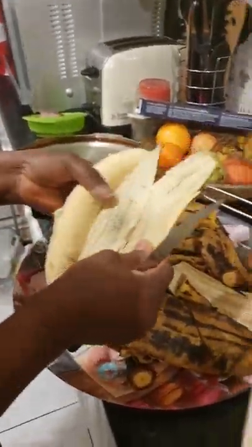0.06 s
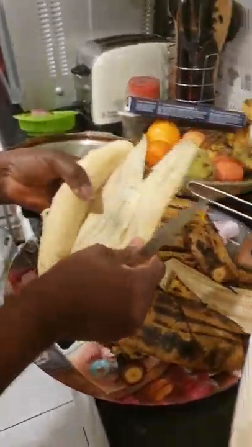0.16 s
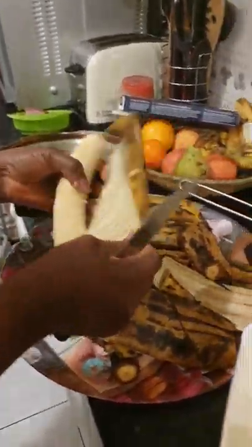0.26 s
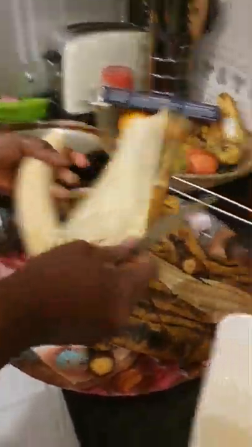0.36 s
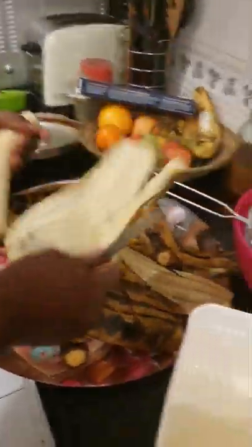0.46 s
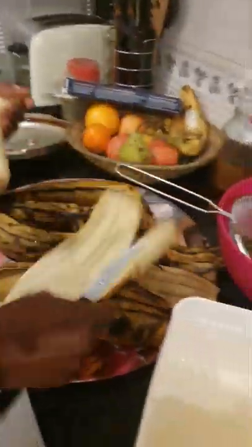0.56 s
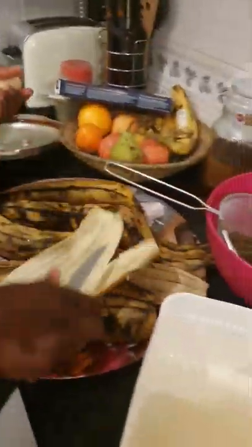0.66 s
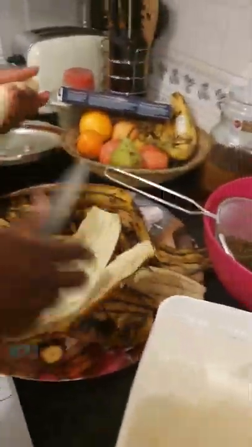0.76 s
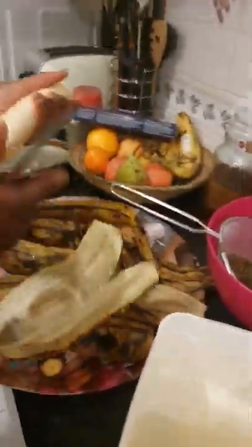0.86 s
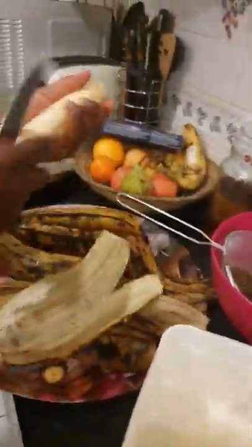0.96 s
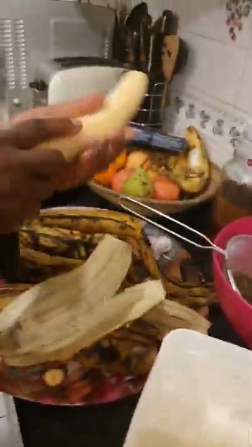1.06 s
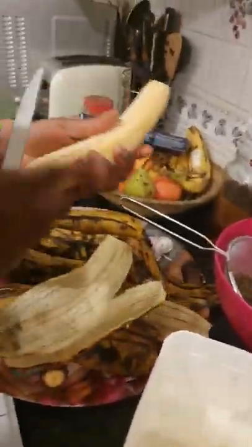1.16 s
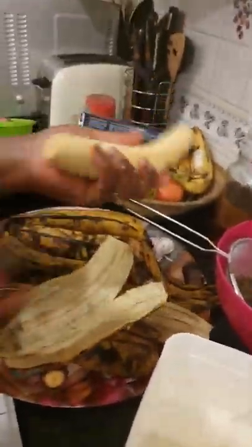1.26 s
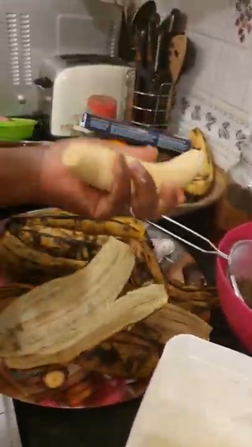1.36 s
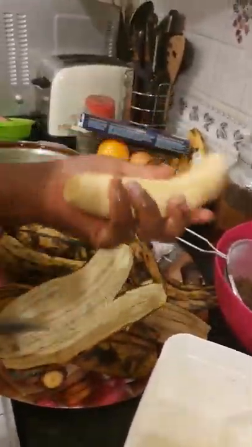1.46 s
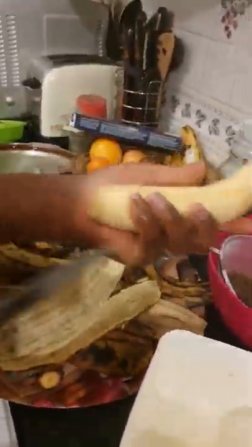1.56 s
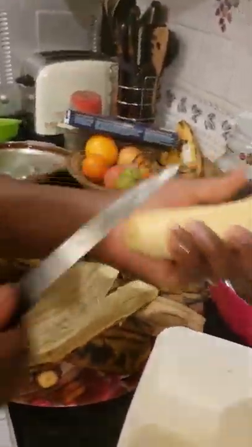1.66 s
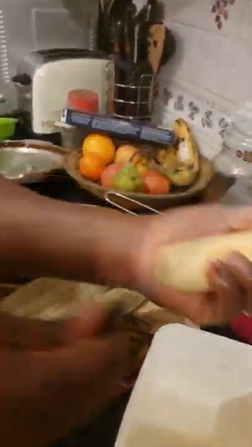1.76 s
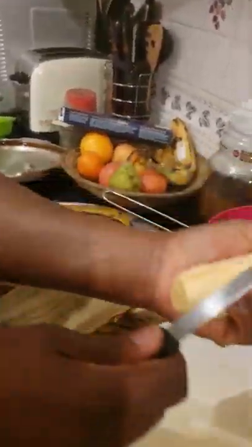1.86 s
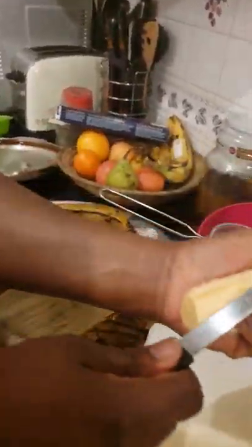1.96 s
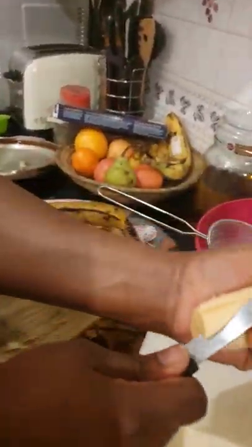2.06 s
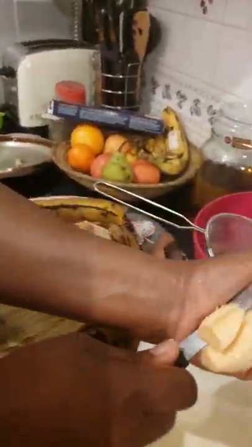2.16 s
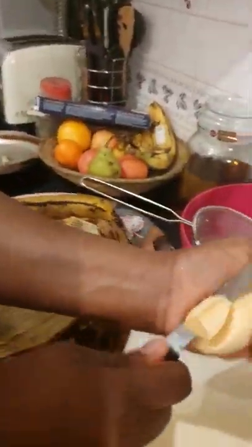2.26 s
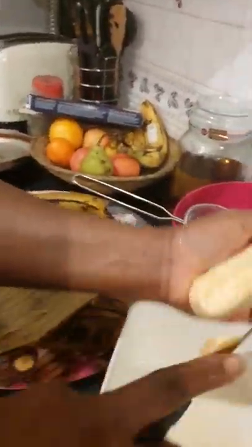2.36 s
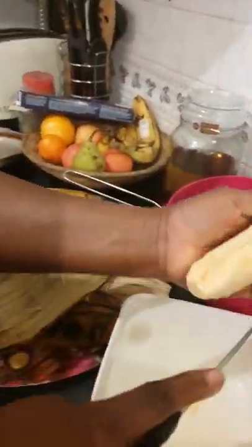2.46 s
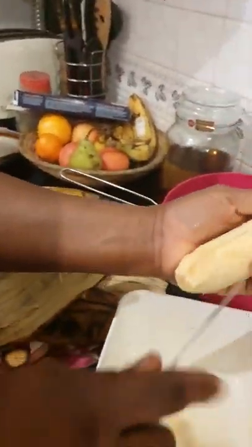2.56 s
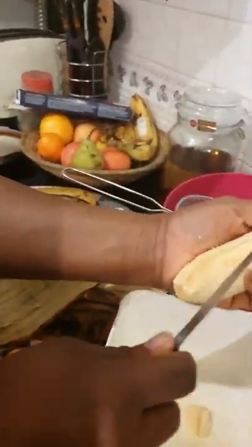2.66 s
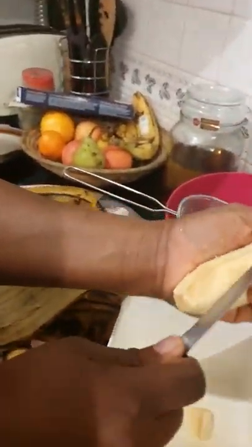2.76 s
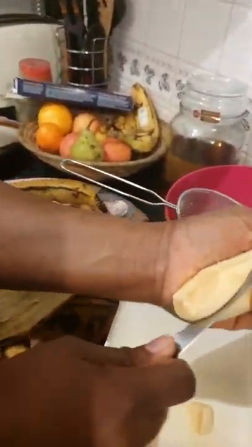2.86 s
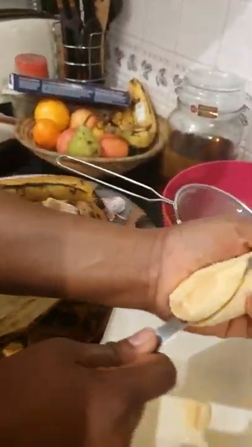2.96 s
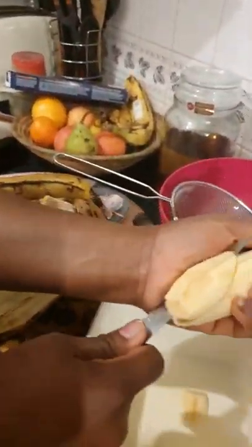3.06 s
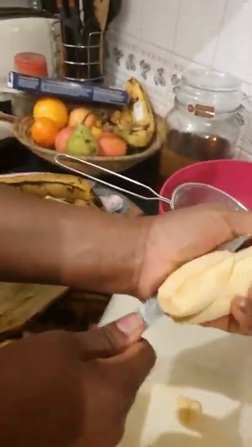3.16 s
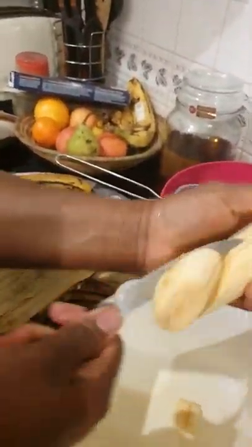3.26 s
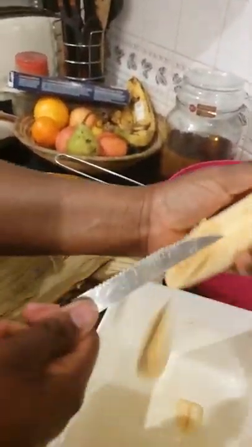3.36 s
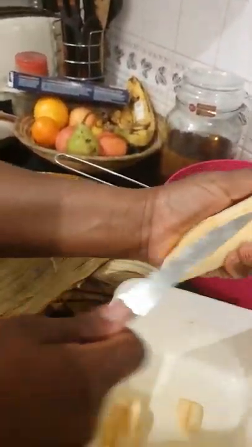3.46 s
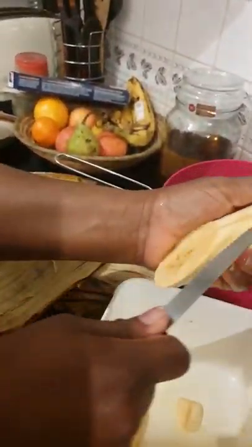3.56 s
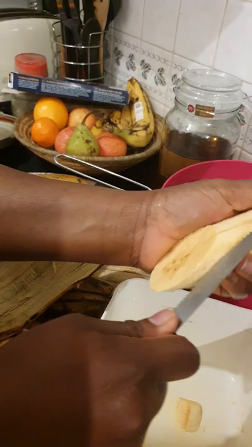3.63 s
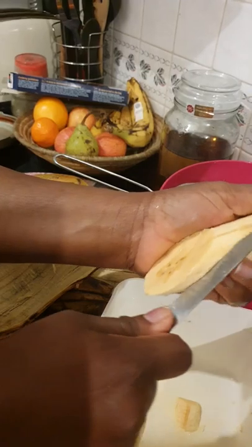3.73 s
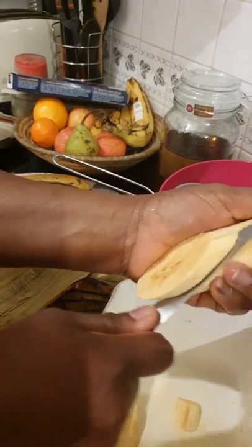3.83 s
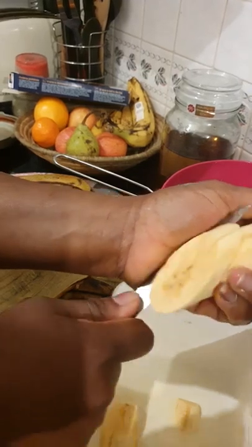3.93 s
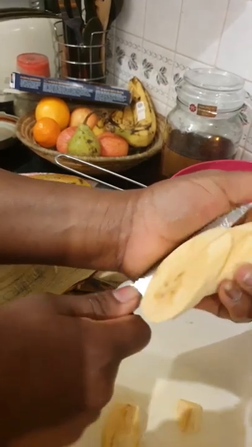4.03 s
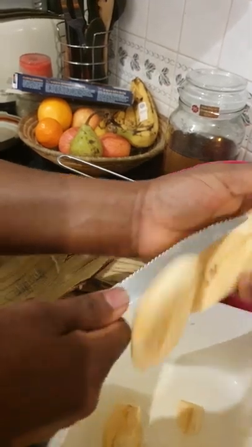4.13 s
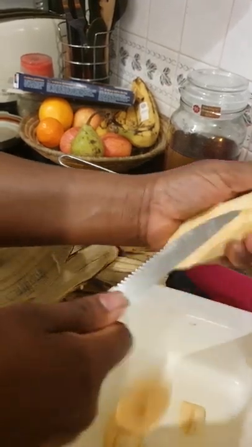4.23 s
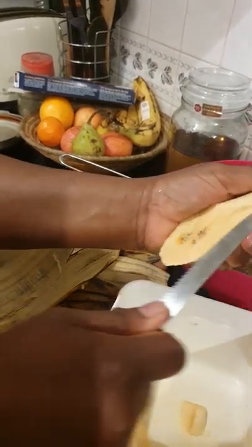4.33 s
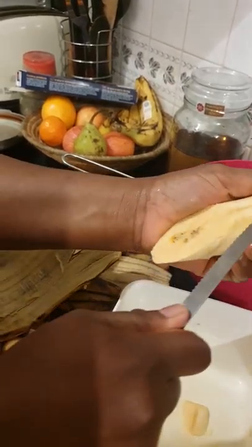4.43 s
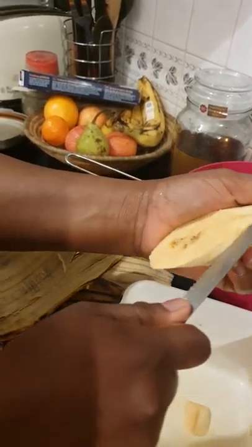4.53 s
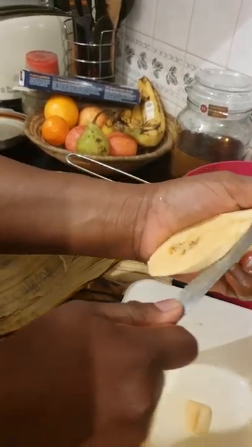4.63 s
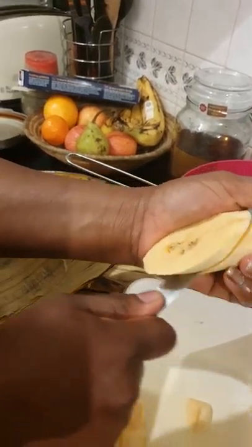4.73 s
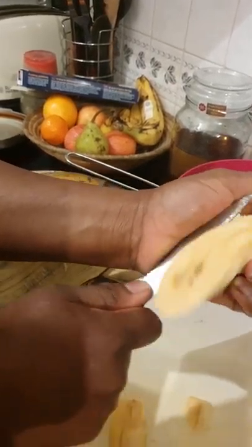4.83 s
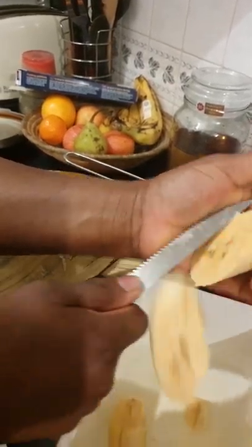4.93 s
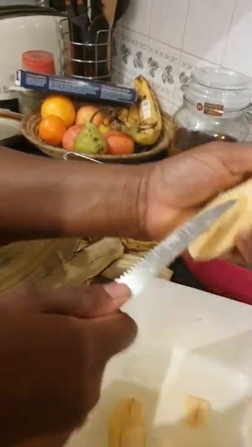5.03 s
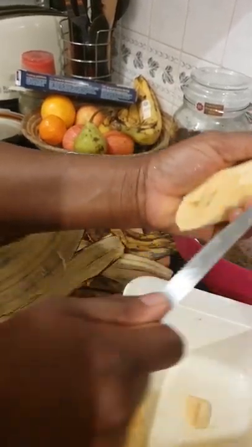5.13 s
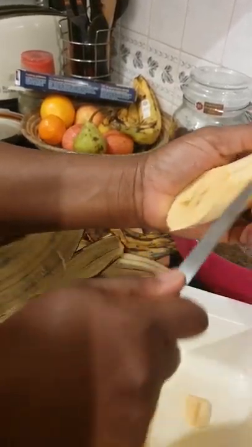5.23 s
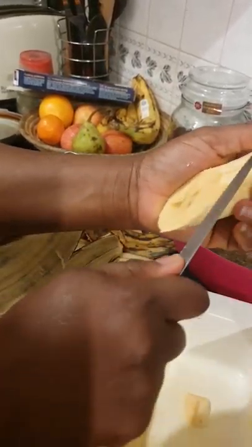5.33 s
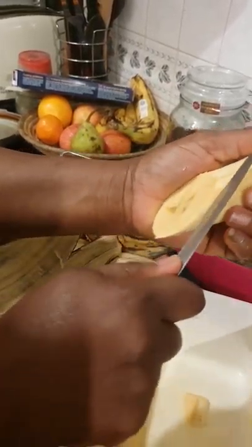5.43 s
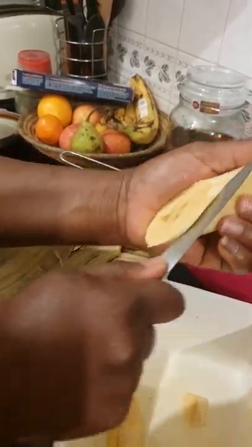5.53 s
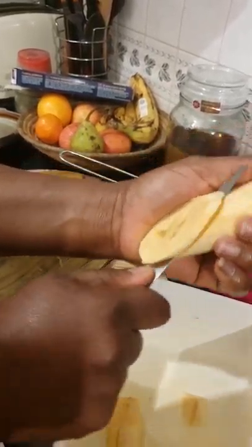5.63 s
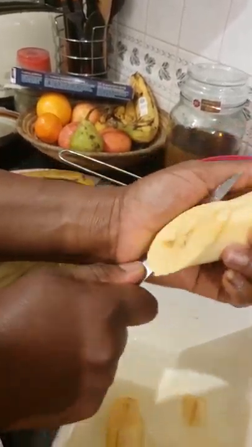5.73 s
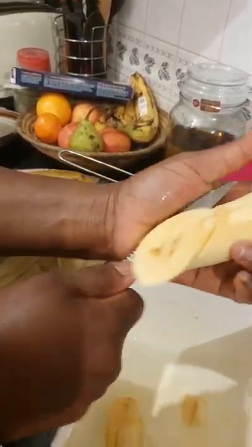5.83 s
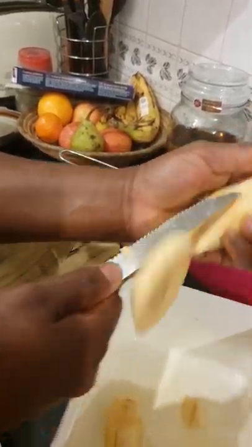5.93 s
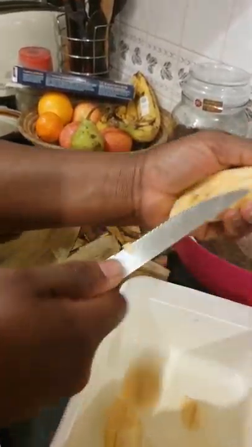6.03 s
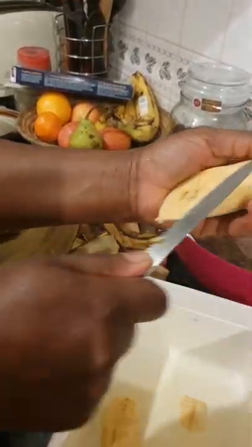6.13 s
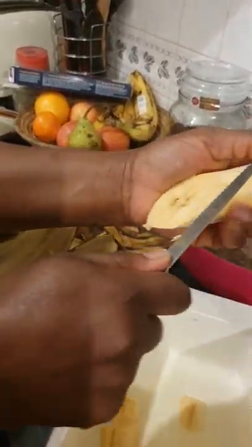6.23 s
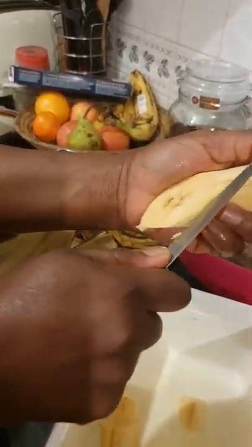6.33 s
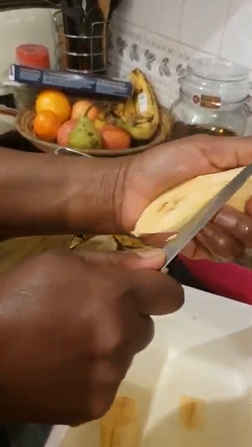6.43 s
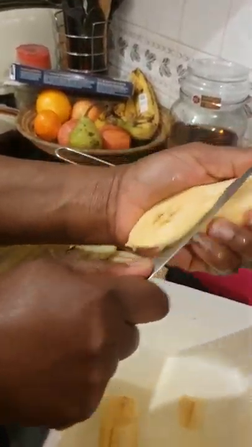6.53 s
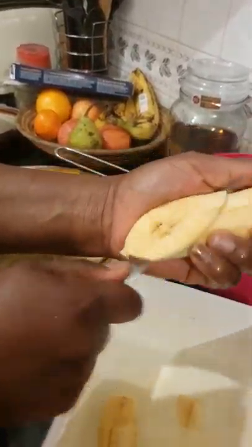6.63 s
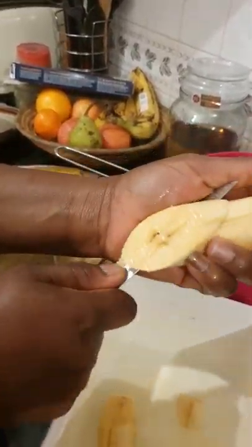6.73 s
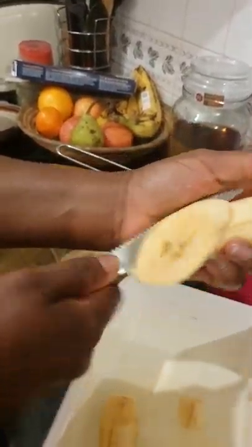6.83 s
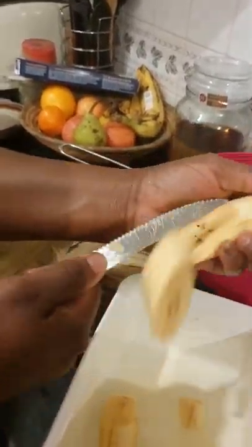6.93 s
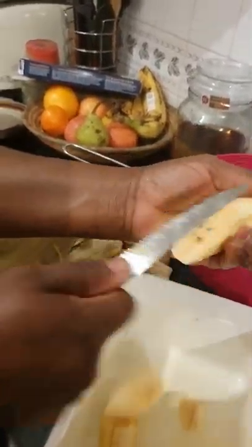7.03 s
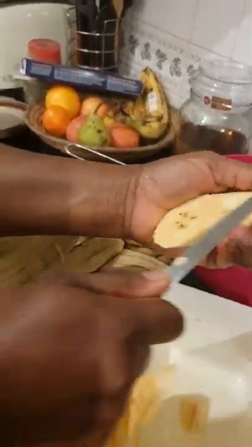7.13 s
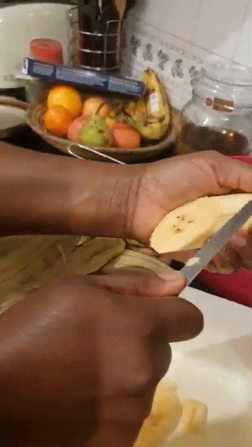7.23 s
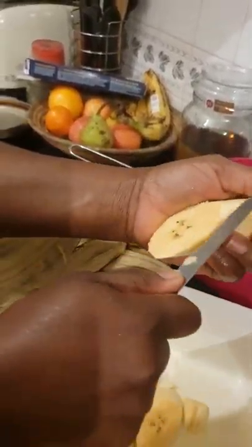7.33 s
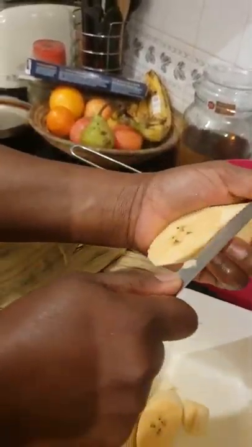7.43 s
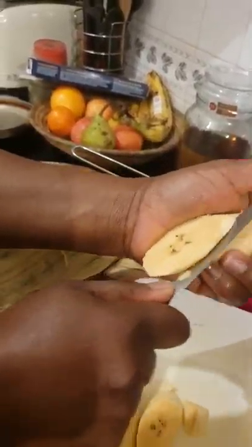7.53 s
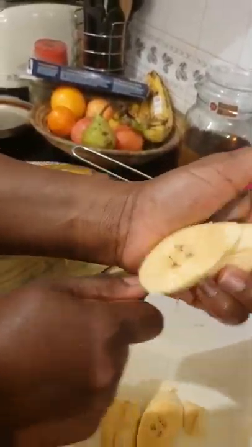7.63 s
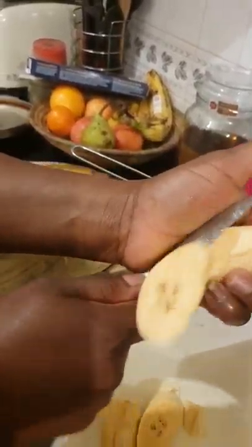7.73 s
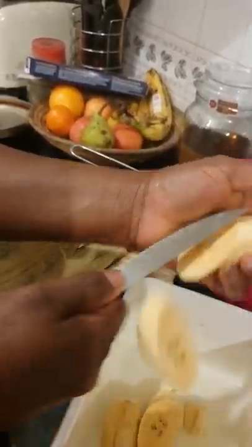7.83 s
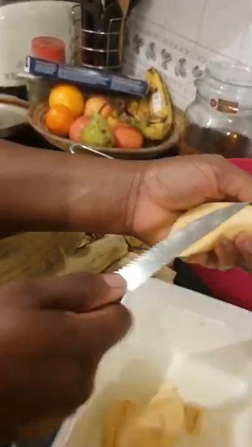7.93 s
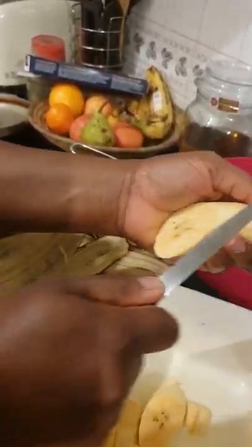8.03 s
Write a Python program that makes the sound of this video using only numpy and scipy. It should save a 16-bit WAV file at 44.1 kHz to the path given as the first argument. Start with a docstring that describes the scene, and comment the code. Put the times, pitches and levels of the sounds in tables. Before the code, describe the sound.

A close stereo kitchen scene with steady low air noise, thin hiss and very faint hum. From 0 to 0.5 seconds, peel tears in soft fibrous crackles, then lands with a small dull bump. Bare fruit rubs quietly in the palm until 1.6, with a sticky tick near 1.5. The first wet cut breaks at 2.1; slices slap the plastic tray around 2.6. More juicy, serrated strokes swell and release near 3.05, 3.9, 4.8, 5.7, 6.7 and 7.6, the later ones with clear snaps. Wet slaps with a deep, short boom and hollow plastic rattle follow around 3.2, a sharp one at 3.5, then 4.3, 5.1, 6.1, a strong one at 7.1, and 7.95. Lighter flops trail some landings. Tiny slippery squeaks precede several cuts, and tiled walls add a brief tail.

```python
"""Peel tears away and bare fruit slides in the palm, then a plantain is sliced in the hand over a plastic tray.
Each knife stroke hisses wetly, as crackling noise that swells to the break, and most end in a clear snap.
Slices slap into the tray as a noisy resonance; damped modes make its floor boom and its walls ring briefly,
and some slices flop over. A small tiled kitchen adds a short tail over steady air noise, hiss and faint hum."""
import sys
import numpy as np
from scipy import signal
from scipy.fft import rfft, irfft
from scipy.io import wavfile

SR = 44100
rng = np.random.default_rng(int(sys.argv[2]) if len(sys.argv) > 2 else 0)


def dump(signal):
    """Clip the signal to [-1, 1] and save it as 16-bit WAV at the path in sys.argv[1]."""
    limited = np.clip(np.atleast_2d(signal).T, -1, 1)
    pcm = np.round(limited * 32767).astype(np.int16)
    wavfile.write(sys.argv[1], SR, pcm)


N = 356769
TIME = np.arange(N) / SR
AGE = TIME[:SR // 2]  # half a second, the time since a single blow

# knife strokes, each building up until the blade breaks free:
# break_s, swell_s (time constant), drag_db, juice_fizz_db, snap_db
CUTS = [(2.135, 0.032, -42.5, -42.5, -54), (3.051, 0.033, -59, -48, -59), (3.934, 0.026, -48, -39.5, -32),
        (4.8012, 0.017, -42.5, -38, -24), (5.7245, 0.049, -60, -44.5, -29), (6.675, 0.034, -42, -40, -33),
        (7.637, 0.025, -40.5, -39.5, -29)]
# bright colour of bursting juice and tearing fibres: pitch_hz, density_db (per Hz)
FIZZ = [(1500, 4), (4000, 11.5), (6000, 7.5), (9000, 2.5), (12000, -2), (15500, -5)]


def undb(db):
    """Decibels to gain."""
    return 10 ** (np.asarray(db) / 20)


def unit(x):
    """Scale to rms 1."""
    return x / np.sqrt(np.mean(x ** 2))


def burst(x, span_s):
    """Scale a blow so that its energy equals that of rms 1 held for span_s."""
    energy = np.sum(x ** 2, axis=-1, keepdims=True)
    return x / np.sqrt(energy / (span_s * SR))


def on_bins(points, size):
    """Join (Hz, value) points on a log-frequency axis, one value per FFT bin."""
    hz, value = np.transpose(points)
    bin_hz = np.fft.rfftfreq(size, 1 / SR)
    return np.interp(np.log(bin_hz + 1), np.log(hz), value)


def colour(x, points, size=2048):
    """Causal minimum-phase filter with the given (Hz, dB) outline, by folding the cepstrum."""
    cepstrum = irfft(np.log(undb(on_bins(points, size))))
    cepstrum[1:size // 2] *= 2
    cepstrum[size // 2 + 1:] = 0
    response = irfft(np.exp(rfft(cepstrum)))
    return signal.fftconvolve(np.atleast_2d(x), response[None], axes=-1)[:, :x.shape[-1]]


def band(x, hz, kind, order=2):
    """Butterworth filter."""
    return signal.sosfilt(signal.butter(order, hz, kind, fs=SR, output="sos"), x)


def add(out, start_s, x):
    """Mix a sound in at start_s."""
    i = int(start_s * SR)
    out[:, i:i + x.shape[-1]] += x[..., :N - i]


def diffuse(size):
    """Noise from all around: alike at both microphones in the bass, unrelated in the treble."""
    # likeness of the two channels: pitch_hz, correlation (no unit)
    likeness_points = [(100, 0.89), (300, 0.93), (700, 0.72), (1500, 0), (10000, 0)]
    likeness = np.clip(on_bins(likeness_points, size), -1, 1)
    mid, side = rfft(rng.standard_normal((2, size)))
    mid = mid * np.sqrt(1 + likeness)
    side = side * np.sqrt(1 - likeness)
    return unit(irfft([mid + side, mid - side], size))


def tray():
    """A soft slice pushes the tray's floor, rings its walls and slaps on its wet face."""
    # slices landing and flopping over:
    # start_s, boom_db (floor), wall_db, wall_hz (pitch the blow favours), slap_db, slap_hz
    drops = [(2.5547, -46, -26.5, 585, -26.5, 2410), (2.5667, -44, -35.5, 570, -17, 2470),
             (2.6821, -57, -34.5, 520, -34.5, 1420), (3.129, -39, -40.5, 330, -37.5, 3080),
             (3.1787, -26.5, -22, 490, -19.5, 3120), (3.213, -41, -31.5, 440, -38, 2700),
             (3.4737, -31, -20.5, 680, -12, 2550), (3.4920, -41, -22, 660, -13.5, 3230),
             (4.2757, -37.5, -32, 354, -22.5, 3020), (4.2795, -58, -45, 1200, -26.5, 1640),
             (4.301, -34.5, -36.5, 334, -54, 2900), (4.465, -37.5, -31.5, 475, -29.5, 2800),
             (5.0683, -29, -35, 354, -33, 2760), (5.0925, -29.5, -28, 350, -25.5, 3100),
             (6.0893, -32, -37, 367, -23.5, 2900), (6.224, -39, -43.5, 395, -36.5, 3160),
             (7.066, -25, -28, 383, -15, 2850), (7.2408, -43, -36, 344, -38, 3000),
             (7.3156, -45, -40.5, 1170, -30.5, 2670), (7.948, -30.5, -28, 378, -24, 3200),
             (7.9545, -46, -38, 590, -28, 3270)]
    # lowest floor modes: pitch_hz, level_db, t60_s
    boom_modes = [(65.8, 1, 0.4), (71.9, 23.5, 0.2), (82.1, -0.5, 0.6), (107, -1.5, 0.53)]
    # next floor modes up: pitch_hz, level_db, t60_s
    thud_modes = [(142.5, -14, 0.17), (163, -5, 0.13), (220.1, -9, 0.17)]
    # wall modes: pitch_hz, level_db, t60_s
    wall_modes = [(304, -10, 0.096), (330, 3, 0.078), (362, 0.5, 0.15), (454, -26, 0.41), (506, -12, 0.14),
                  (565.6, -8, 0.4), (634, 6.5, 0.17), (672, 5.5, 0.2), (726, -1, 0.19), (839, 3, 0.17),
                  (1012, -4, 0.15), (1070, -5, 0.12), (1183, -11, 0.34), (1344, -27, 0.043),
                  (1524, 13.5, 0.035)]
    # stiff modes that only a sharp slap reaches: pitch_hz, level_db, t60_s
    stiff_modes = [(1402, 1.5, 0.12), (1720, -6, 0.055), (1960, -1, 0.11), (2297, 9, 0.049),
                   (2425, 7.5, 0.027), (2720, 6, 0.025), (2810, -29, 0.044), (2860, 5.5, 0.11),
                   (3360, 15.5, 0.035)]
    # colour of the wet slap: pitch_hz, density_db (per Hz)
    slap_colour = [(200, -30), (600, -14), (1100, 15), (1700, 3.5), (2400, 4), (3300, 7.5), (4200, 10),
                   (5000, -9.5), (8000, -17), (15000, -36)]
    boom_rise_s = 0.022
    out = np.zeros((2, N))
    lean = undb(np.array([[-1.3], [1.3]]))  # the tray stands a little to the right
    for start_s, boom_db, wall_db, wall_hz, slap_db, slap_hz in drops:
        thud_db = (boom_db + wall_db) / 2 - 5
        # higher slaps are wetter: 32 dB more spray per octave
        spray_db = slap_db - 11.5 + 32 * np.log2(slap_hz / 2990)

        boom = ring(boom_modes, scatter_db=-1.0, spread_hz=740)
        boom = burst(boom * (1 - np.exp(-AGE / boom_rise_s)), 0.047)
        thud = burst(ring(thud_modes, scatter_db=4, spread_hz=3600), 0.016)

        # the flesh squashes against the plastic and blurs the ring
        squash = band(diffuse(len(AGE)) * np.exp(-AGE / 0.016), [200, 2000], "band")
        walls = burst(ring(wall_modes, scatter_db=2.8, spread_hz=930), 0.0058)
        walls = walls + undb(-9.5) * burst(squash, 0.084)
        # a flatter landing pushes longer and leaves the higher modes still
        walls = band(favour(walls, wall_hz, 0.9), 1.27 * wall_hz, "low")
        walls = burst(walls, 0.012)

        stiff = ring(stiff_modes, scatter_db=-1.0, spread_hz=1100)
        stiff = burst(favour(stiff, slap_hz, 1.55), 0.0084)
        slap = smack(slap_hz, decay_s=0.0016, width_hz=850, grit=0.6, broad=0.3, outline=slap_colour)
        wet_face = undb(slap_db) * (slap + undb(-12.5) * stiff)
        wet_face = wet_face + undb(spray_db) * spray(decay_s=0.0053)

        add(out, start_s, undb(wall_db) * walls - undb(boom_db) * boom + undb(thud_db) * thud)
        add(out, start_s, lean * wet_face)
    return out


def ring(modes, scatter_db, spread_hz):
    """Damped modes: strength varies with the spot struck, and higher modes reach the microphones out of step."""
    hz, db, t60_s = np.transpose(modes)[:, :, None]
    gain = undb(db + scatter_db * rng.standard_normal(hz.shape))
    skew = np.minimum(hz / spread_hz, 1) * rng.standard_normal(hz.shape)
    detune = 1 + 0.0065 * rng.standard_normal(hz.shape)  # pitch varies slightly at random from blow to blow
    onset = 1 - np.exp(-AGE / 0.00025)
    waves = gain * np.exp((2j * np.pi * hz * detune - np.log(1000) / t60_s) * AGE) * onset
    return np.array([np.sum(waves * np.exp(1j * side * skew), axis=0).imag for side in (1, -1)])


def favour(x, hz, sharpness):
    """The spot and length of a blow favour the modes around one pitch."""
    return signal.lfilter(*signal.iirpeak(hz, sharpness, fs=SR), x)


def smack(hz, decay_s, width_hz, grit, broad, outline):
    """Wet faces meet or part: a sharp click and a short spatter ring one broad resonance."""
    spatter = burst(rng.standard_normal((2, len(AGE))) * np.exp(-AGE / decay_s), 1 / SR)
    click = signal.unit_impulse(len(AGE), SR // 2000)  # half a millisecond in
    push = click + grit * spatter
    pocket = signal.lfilter(*signal.iirpeak(hz, hz / width_hz, fs=SR), push)
    return burst(colour(pocket + broad * push, outline), 0.002)


def spray(decay_s):
    """A bright spit of bursting juice films, as decaying noise."""
    spit = rng.standard_normal((2, len(AGE))) * np.exp(-AGE / decay_s)
    return burst(colour(spit, FIZZ), 0.0029)


def knife():
    """The blade draws in, then force builds and lets go; serrations drag in small slips and burst juicy cells."""
    # blade drawn through the flesh early in a cut: start_s, length_s, level_db
    draws = [(2.83, 0.28, -55.5), (3.8, 0.11, -56), (4.67, 0.068, -52), (4.755, 0.011, -47),
             (5.55, 0.055, -47), (6.515, 0.061, -50.5), (6.635, 0.024, -55), (7.53, 0.038, -50.5)]
    # colour of the dragging blade: pitch_hz, density_db (per Hz)
    drag_colour = [(150, -17.5), (400, -21.5), (900, -16.5), (1700, -14), (2200, -7.5), (2600, -12),
                   (3100, -5.5), (3900, -5), (4800, -16.5), (7000, -31), (15000, -33)]
    release_s = 0.0082
    drag_gain = rubbing(draws)
    fizz_gain = undb(-4.5) * drag_gain
    for break_s, swell_s, drag_db, fizz_db, _ in CUTS:
        # exponential rise to the break, then a quicker fall
        force = np.exp(-np.maximum((break_s - TIME) / swell_s, (TIME - break_s) / release_s))
        drag_gain = drag_gain + undb(drag_db) * force
        fizz_gain = fizz_gain + undb(fizz_db) * force
    slips = undb(2.55 * unit(band(rng.standard_normal(N), 49, "low")))  # level wobble, 2.55 dB rms
    drag = unit(colour(crackle(rate_hz=1500, spread_db=2, hiss=0.5), drag_colour))
    fizz = unit(colour(crackle(rate_hz=5500, spread_db=0, hiss=1.8), FIZZ))
    return slips * (drag_gain * drag + fizz_gain * fizz)


def rubbing(rows):
    """Gain over time of sliding contacts: each takes hold, sags as it goes on and dies away."""
    attack_s, release_s, sag_db_per_s = 0.0073, 0.024, -12
    gain = np.zeros(N)
    for start_s, length_s, level_db in rows:
        age = np.maximum(TIME - start_s, 0)
        hold = undb(level_db + sag_db_per_s * (np.minimum(age, length_s) - length_s / 2))
        fade = np.exp(-np.maximum(age - length_s, 0) / release_s)
        gain += np.minimum(age / attack_s, 1) * hold * fade
    return gain


def crackle(rate_hz, spread_db, hiss):
    """Many tiny ruptures of uneven size over a smooth hiss."""
    ruptures = rng.random(N) < rate_hz / SR
    sizes = undb(spread_db * np.minimum(rng.exponential(size=N), 4))
    grains = ruptures * rng.standard_normal(N) * sizes
    return unit(unit(grains) + hiss * rng.standard_normal((2, N)))


def snaps():
    """The last fibres of each cut give way, and sticky faces part: short resonant smacks and spits."""
    # sticky ticks of fingers and blade: start_s, level_db, pitch_hz
    ticks = [(0.6098, -41.5, 1420), (1.5195, -28.5, 1900), (1.920, -39.5, 4400), (3.29, -50, 3450),
             (4.683, -45, 3200), (6.578, -45, 3000), (6.614, -39, 3400)]
    # a wet slice peels off the tray's floor with a thin spit: start_s, level_db
    spits = [(3.291, -50), (6.167, -43.5)]
    # colour of a wet snap: pitch_hz, density_db (per Hz)
    snap_colour = [(300, -47), (1200, 3), (2400, -2), (3100, 10), (4200, 4), (5500, -20), (8000, -24),
                   (15000, -18)]
    break_hz, break_decay_s = 3650, 0.002
    out = np.zeros((2, N))
    for break_s, _, _, _, snap_db in CUTS:
        snap = smack(break_hz, break_decay_s, width_hz=760, grit=7.5, broad=0.023, outline=snap_colour)
        add(out, break_s, undb(snap_db) * (snap + undb(-4) * spray(break_decay_s)))
    for start_s, level_db, pitch_hz in ticks:
        tick = smack(pitch_hz, 0.0028, width_hz=1000, grit=6.7, broad=0.034, outline=snap_colour)
        add(out, start_s, undb(level_db) * tick)
    for start_s, level_db in spits:
        add(out, start_s, undb(level_db) * spray(decay_s=0.0038))
    return out


def squeaks():
    """Wet skin and steel slip irregularly on the fruit and ring a narrow resonance that glides in pitch."""
    # start_s, length_s, level_db, start_hz, end_hz
    glides = [(0.787, 0.28, -54.5, 2727, 2864), (3.811, 0.11, -54, 3350, 3900),
              (4.575, .09, -52.5, 1600, 2090), (4.75, 0.05, -52, 2230, 2580),
              (5.324, 0.0436, -57, 5500, 5960), (6.515, 0.057, -46.5, 3440, 3730),
              (6.607, 0.055, -43, 3320, 3270)]
    out = np.zeros((2, N))
    for start_s, length_s, level_db, start_hz, end_hz in glides:
        progress = np.clip(AGE / length_s, 0, 1)
        phase = 2 * np.pi * np.cumsum(start_hz + (end_hz - start_hz) * progress) / SR
        # slow noise on both quadratures makes a narrow band around the glide
        jitter = band(rng.standard_normal((2, len(AGE))), 210, "low")
        tone = unit(jitter[0] * np.sin(phase) + jitter[1] * np.cos(phase))
        add(out, start_s, undb(level_db) * np.sin(np.pi * progress) * tone)
    return out


def hands():
    """Peel tears off and falls on the heap; the bare fruit slides round in the palm."""
    # pulls that tear the peel away: start_s, length_s, level_db
    pulls = [(0, 0.13, -55), (.15, 0.24, -58.5), (.228, 0.05, -49.5), (.46, 0.04, -56)]
    # fruit and peel sliding in the palm: start_s, length_s, level_db
    slides = [(.6, 0.2, -56.5), (.83, 0.26, -56.5), (1.31, 0.23, -53), (1.512, 0.11, -46),
              (3.708, 0.043, -48)]
    # peel falling on the heap, and soft bumps of the hands: start_s, level_db, length_s, corner_hz
    bumps = [(0.509, -41, 0.0094, 600), (0.602, -50, 0.051, 255), (0.643, -47.5, 0.064, 124),
             (.87, -50, 0.096, 120), (1.917, -55, 0.023, 150), (3.016, -51, 0.015, 610),
             (4.808, -46.5, 0.02, 500)]
    # colour of rubbing skin: pitch_hz, density_db (per Hz)
    rub_colour = [(150, -5), (400, 1), (800, -3), (1400, -1.5), (2000, -7.5), (2800, -1.5), (3900, -2.5),
                  (5000, -13), (8000, -78), (15000, -66)]
    tearing, sliding = rubbing(pulls), rubbing(slides)
    rub = unit(colour(crackle(rate_hz=3000, spread_db=2.5, hiss=1), rub_colour))
    fibres = unit(colour(crackle(rate_hz=2600, spread_db=4.0, hiss=0.58), FIZZ))
    out = rub * (sliding + undb(-3) * tearing) + fibres * (tearing + undb(-13) * sliding)
    for start_s, level_db, length_s, corner_hz in bumps:
        thud = unit(band(rng.standard_normal(len(AGE)), [55, corner_hz], "band"))
        swell = 2 * AGE / length_s * np.exp(1 - 2 * AGE / length_s)  # peaks at half the length
        add(out, start_s, undb(level_db) * thud * swell)
    return out


def room(x, low_db, mid_db, high_db, low_t60, mid_t60, high_t60):
    """Counter, tiles and cupboards return a short dense tail, as decaying noise in three bands (t60 in s)."""
    noise = diffuse(len(AGE)) * np.clip((AGE - 0.002) / 0.0026, 0, 1)
    bands = [([130, 900], low_db, low_t60), ([900, 4500], mid_db, mid_t60), ([4500, 16000], high_db, high_t60)]
    tail = 0
    for edges_hz, level_db, t60_s in bands:
        decaying = burst(noise * np.exp(-np.log(1000) * AGE / t60_s), 1 / SR)
        tail = tail + undb(level_db) * band(decaying, edges_hz, "band")
    return x + signal.fftconvolve(x, tail, axes=-1)[:, :N]


def background(air_db, hum_hz, hum_db, hiss_db):
    """Steady kitchen air, a thin high hiss and the faint hum of an appliance."""
    # colour of the room noise: pitch_hz, density_db (per Hz)
    air_colour = [(25, -28), (50, -8), (98, -5), (170, -11.5), (300, -9), (480, -16), (640, -10),
                  (900, -14.5), (1450, -12.5), (2050, -22.5), (3300, -12.5), (4800, -21), (8800, -27.5),
                  (16000, -39.5)]
    air = unit(colour(diffuse(N), air_colour))
    hiss = unit(band(rng.standard_normal((2, N)), [9600, 10100], "band", order=1))
    hum = np.sin(2 * np.pi * hum_hz * TIME)
    return undb(air_db) * air + undb(hiss_db) * hiss + undb(hum_db) * hum


def scene():
    """All the work happens at arm's length, slightly to the right, in the same small room."""
    near = tray() + knife() + snaps() + squeaks() + hands()
    near = np.array([np.roll(near[0], 3), near[1]])  # left lags by 3 samples
    wet = room(near, low_db=-4.5, mid_db=-4.5, high_db=-5.5, low_t60=0.24, mid_t60=0.26, high_t60=0.24)
    return wet + background(air_db=-53, hum_hz=97.3, hum_db=-62.0, hiss_db=-71.5)


def record(dry):
    """Each microphone port adds its own colour; peaks are clipped and a steep low-pass cuts the top."""
    # difference between the two ports: pitch_hz, left_minus_right_db
    ports = [(200, 0), (380, 0), (520, -2.5), (850, 1.5), (1400, 11.5), (2200, 9.5), (2700, 12.5),
             (3600, 15), (4600, 6), (6400, 6.5), (8000, -5), (10000, -3.5), (13000, -3.5), (16000, -1)]
    top_hz = 15900
    left = colour(dry[0], [(hz, db / 2) for hz, db in ports])
    right = colour(dry[1], [(hz, -db / 2) for hz, db in ports])
    clipped = np.clip(np.vstack([left, right]), -1, 1)
    return signal.sosfilt(signal.ellip(8, 0.2, 70, top_hz, fs=SR, output="sos"), clipped)


dry = scene()
out = record(dry)
dump(out)
```